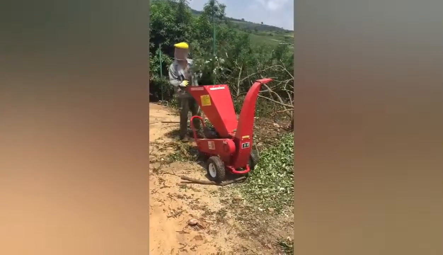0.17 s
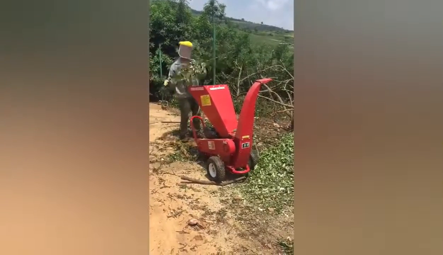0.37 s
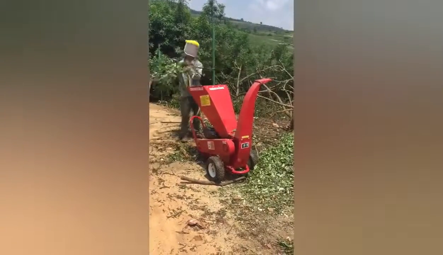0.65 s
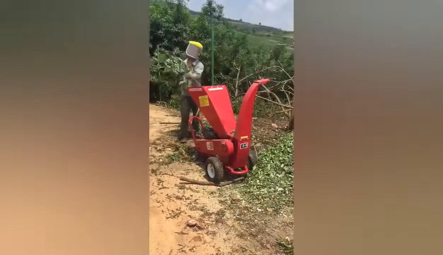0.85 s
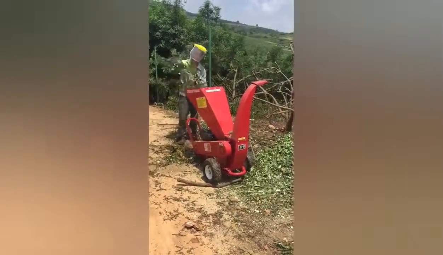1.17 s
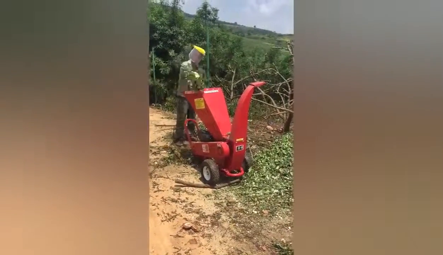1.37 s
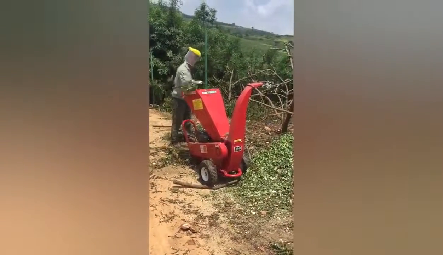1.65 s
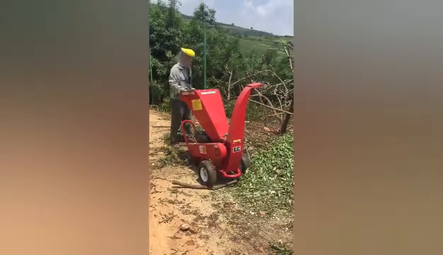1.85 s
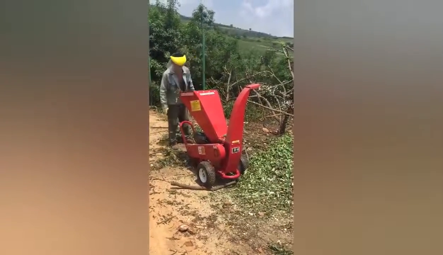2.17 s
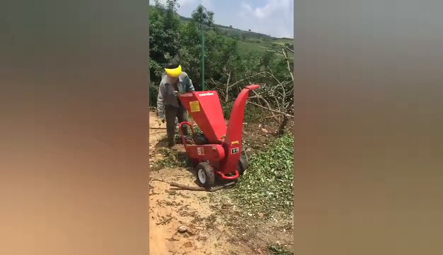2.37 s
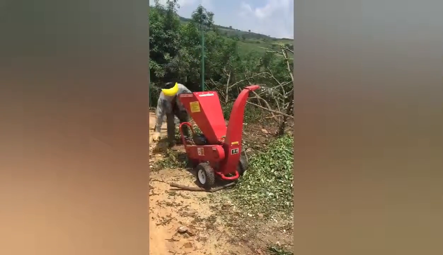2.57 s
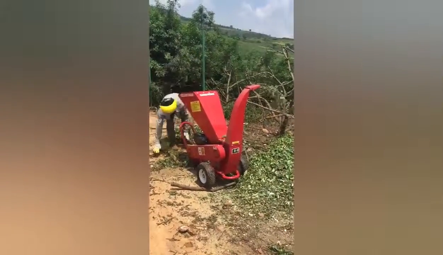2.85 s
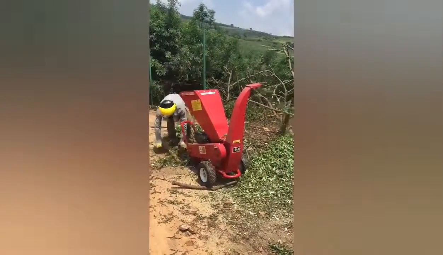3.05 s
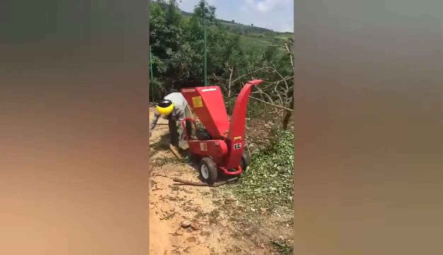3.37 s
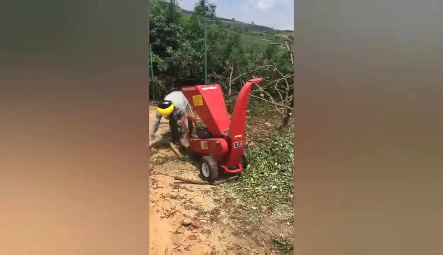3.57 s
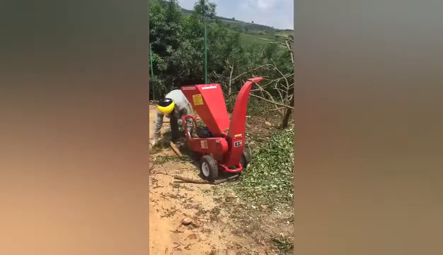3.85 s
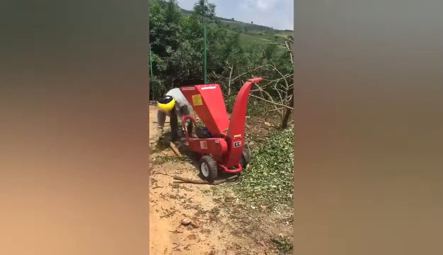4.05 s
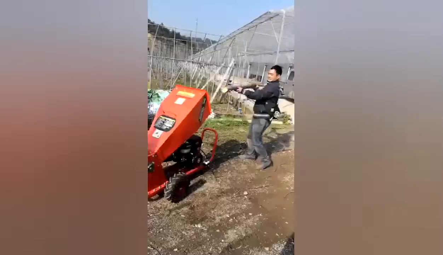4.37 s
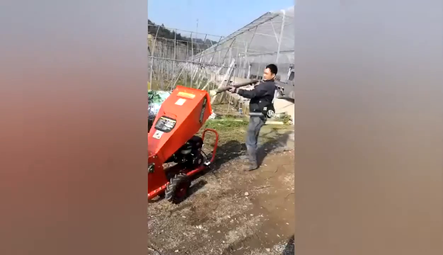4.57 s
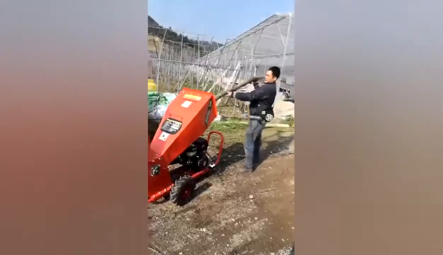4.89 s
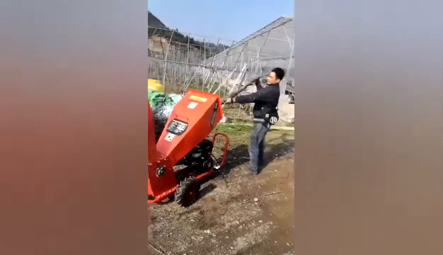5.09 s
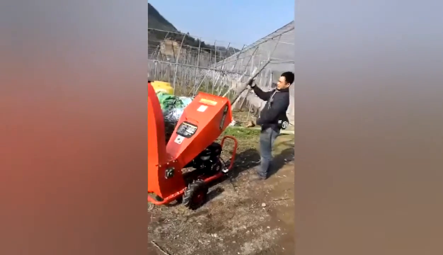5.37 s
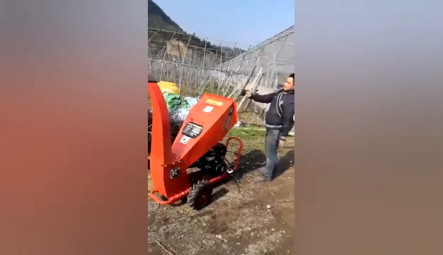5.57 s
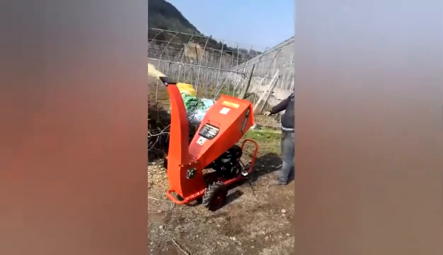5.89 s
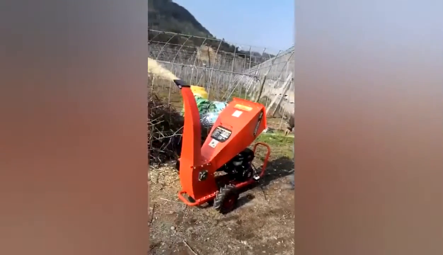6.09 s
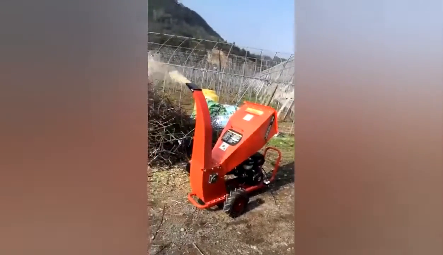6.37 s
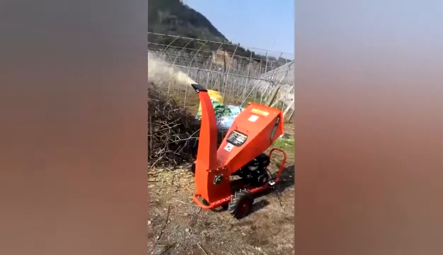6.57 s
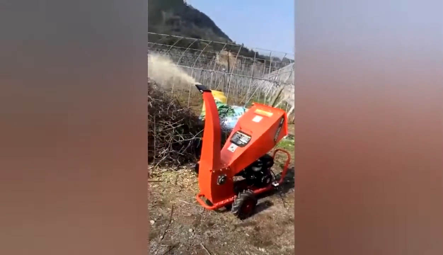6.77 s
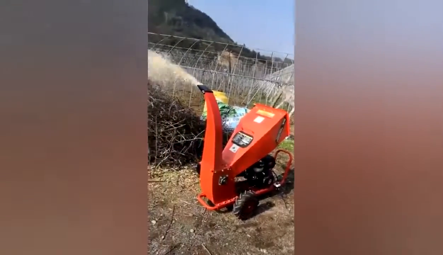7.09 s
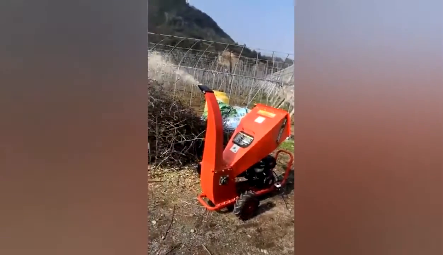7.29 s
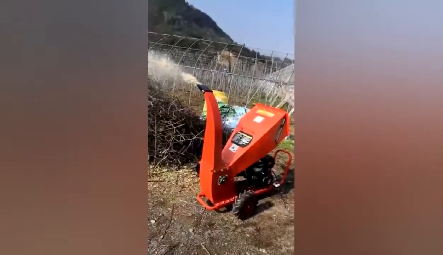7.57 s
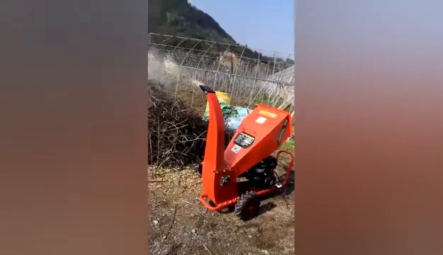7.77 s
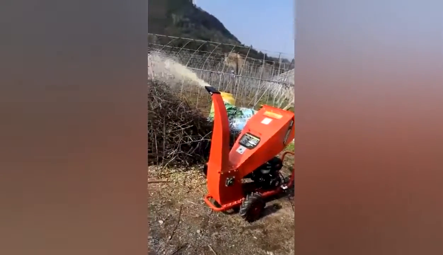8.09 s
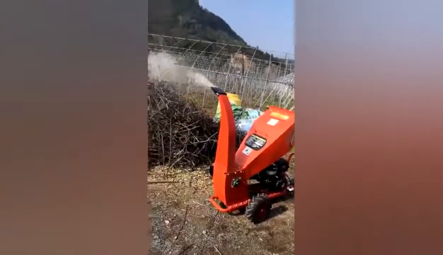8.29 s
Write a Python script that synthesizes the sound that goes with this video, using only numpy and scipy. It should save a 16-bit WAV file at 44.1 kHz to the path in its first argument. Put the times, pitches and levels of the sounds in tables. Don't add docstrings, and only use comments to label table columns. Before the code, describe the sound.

Two engine-driven chippers heard one after the other in open air. The first is far and soft: steady low drone, light metallic ticking, then a spell of twig crackle and drum ringing. After a blink of silence the second starts abruptly, near and loud, droning freely, then dropping in pitch as knives batter wood and chips spray from the chute. Treble is patchy and slightly watery.

```python
import sys
import numpy as np
from scipy import signal
from scipy.fft import rfft, irfft, next_fast_len
from scipy.io import wavfile
from scipy.ndimage import uniform_filter1d, minimum_filter1d

SR = 44100
rng = np.random.default_rng(int(sys.argv[2]) if len(sys.argv) > 2 else 0)


def pcm_store(signal):
    levels = np.round(np.clip(np.atleast_2d(signal), -1, 1) * 32767)
    wavfile.write(sys.argv[1], SR, levels.astype(np.int16).T)


def boost_factor(decibels):
    exponent = np.asarray(decibels, float) / 20
    return 10 ** exponent


N = 372204
TIME = np.arange(N) / SR

# start in seconds, end in seconds.
NEAR_SPAN = (4.647, 8.45)
FAR_SPAN = (0, 4.3375)

# time in seconds, firings per second.
NEAR_SPEED = [(4.65, 30.0), (4.88, 30.1), (5.79, 30.1), (5.99, 26.9), (6.09, 25.5), (6.2, 25.4),
              (6.87, 26.3), (6.95, 26.3), (7.04, 25.9), (7.14, 26.0), (7.64, 27.1), (7.71, 27.7),
              (7.95, 28.3), (8.04, 28.2), (8.27, 29.0), (8.44, 29.1)]
# time in seconds, drone in dB.
NEAR_EXHAUST = [
    (4.65, -27),
    (5.75, -26.3),
    (5.9, -31.5),
    (6.15, -32),
    (6.45, -31.5),
    (6.6, -29),
    (7.4, -29),
    (8.44, -30.3),
]
# multiple of the firing rate, level in dB.
FREE_ORDERS = [(1, -31), (2, -20), (3, -8), (4, 0), (5, -1), (6, -1), (7, -7), (8, -1), (9, -8), (10, -12),
               (11, -14), (26, -11), (30, -13)]
LOADED_ORDERS = [(1, -34), (2, -21), (3, -15), (4, -10), (5, -5), (6, 1), (7, 2), (8, -4), (9, -2), (10, 1),
                 (11, -8), (12, -2), (13, -8), (14, -5), (17, -7), (20, -8)]
# multiple of the knife rate, level in dB.
ROTOR_ORDERS = [(1, -32), (2, -30), (3, -42), (4, -33), (5, -39), (10, -40)]
# frequency in Hz, level in dB per Hz.
FRAME_RUMBLE = [(15, -57), (25, -28), (70, -15.5), (113, -3), (166, -7), (210, -7), (260, -1), (340, -59),
                (570, -120)]
# time in seconds, knife grip as hopper blows in dB, chip flow in dB.
FEED = [(4.65, -33, -40), (4.72, -62, -31.5), (4.87, -52, -35), (4.95, -34, -31.5), (5.74, -42, -32),
        (5.83, -24, -27), (6.17, -17, -26.5), (6.27, -19.5, -29), (6.55, -20, -28.5), (6.75, -17.5, -28.5),
        (7.1, -18.5, -28.5), (7.5, -16, -29.5), (7.9, -21.5, -28), (8.1, -17.5, -29), (8.44, -16, -27.5)]
# time in seconds, change in dB.
BITES = [(4.659, 8.5), (5.15, -0.5), (5.84, 2), (6.02, 0.5), (6.19, 2), (6.31, -2), (6.421, 2), (6.57, 0),
         (6.69, 0.5), (6.97, 0.5), (7.09, -1.5), (7.31, 2.5), (7.551, 2), (7.62, -5.5), (7.66, 2.5),
         (7.71, -4), (7.769, 0.5), (7.88, -2), (8.07, 2.5), (8.211, -8), (8.26, -2), (8.33, -3),
         (8.39, -1.5)]
# time in seconds, peak in dB.
CHOPS = [(4.693, -14), (4.8216, -17), (4.8919, -9), (4.9996, -19), (5.0356, -13), (5.0969, -10),
         (5.1688, -15), (5.3104, -15.5), (5.3454, -14), (5.468, -13), (5.5878, -22), (5.6781, -25),
         (5.835, -11), (5.962, -15), (6.0089, -13), (6.097, -6), (6.1421, -17), (6.236, -11), (6.3316, -29),
         (6.3665, -18), (6.5057, -28), (6.541, -12), (6.632, -15), (6.7931, -17), (6.888, -8), (6.918, -22),
         (6.954, -12), (6.9981, -21), (7.0428, -13.5), (7.1343, -15), (7.2201, -25), (7.37, -17),
         (7.476, -7), (7.548, -6.5), (7.6303, -6), (7.757, -1), (7.82, -7), (7.8729, -5), (8.0576, -9),
         (8.1441, -15), (8.234, -6), (8.3051, -8), (8.374, -5), (8.419, -7)]
# frequency in Hz, width in Hz, level in dB.
HOPPER = [(220.7, 10.7, 1), (306, 13, 1.5), (305, 15, -36), (387, 51, 3.5), (445.4, 75, -3),
          (525.8, 34, -2.5)]
# time in seconds, pitch in Hz, level in dB against the blows.
KNIFE_HUM = [(5.77, 314.2, 7), (5.97, 281, 4), (6.05, 300.3, -30), (6.18, 338, 6), (6.4, 329.2, -5),
             (6.8, 320, -10), (6.95, 306, 3.5), (7.1, 301.8, -4.5), (7.65, 295.2, -4), (7.78, 296.8, -3.5),
             (8.0, 296, 2), (8.3, 298, -0.5), (8.44, 299.6, -8)]
# time in seconds, change in dB.
SWELLS = [(5.83, 8), (6.2, -8), (6.33, 0), (6.42, 8), (6.58, -3), (6.69, 12.5), (6.74, -14), (6.95, -1),
          (7.07, -4), (7.69, -2), (7.76, 12), (7.82, -9), (7.95, 2), (8.07, 5.5), (8.115, -15), (8.17, 8),
          (8.22, -2), (8.26, 9), (8.35, 3)]
# frequency in Hz, level in dB per Hz.
NEAR_CASING = [(260, -2), (450, -8.5), (526, -12), (570, -13), (680, -12), (769, -7), (841, -10), (920, -8),
               (1440, -8), (1940, -6), (2270, -8), (2760, -9), (2950, -10.5), (4700, -23), (5880, -25.5),
               (6500, -29), (8450, -45), (14300, -120)]
# frequency in Hz, width in Hz, level in dB.
PANELS = [(780, 20, -44), (905, 16, -45), (1171, 16, -43), (1516, 22, -42), (1993, 40, -42),
          (2720, 40, -42)]
BIG_PANELS = [(2612, 380, -32), (1967, 76, -38.5), (1780, 390, -40)]
# time in seconds, upper, middle and lower panel in dB,
# share of the low notch from 0 to 1.
WALK = [(4.65, 7, 8, 3, 0.064), (5.7, 1.5, -16, -6, .1), (6.05, 0, 1, -8, 1), (6.68, 5.5, -9, -13, 1),
        (6.76, -6, -5, -6, 1), (6.81, -2, 4, 16, 1), (7.0, -2, 4, 5, 0.99), (7.1, 3, -4, 3, 1),
        (7.2, -17, 0, 5, 1), (7.3, -1, 1, -10, 0.97), (7.45, 0, 10, -1, 1), (7.5, -17, 11, -3, 1),
        (7.8, -2, -5, -1, 0.88), (8.44, -7, 8, -11, 0.66)]
# frequency in Hz, level in dB per Hz.
CHIP_HISS = [(3240, -49), (5500, 0.5), (5890, 1), (6410, -2), (6980, -0.5), (8460, 1.5), (9250, 6),
             (9700, 5), (10700, 1), (12200, -13.5), (14100, -19), (15200, -30)]
# frequency in Hz, width in Hz, depth from 0 to 1.
NOTCHES = [(7230, 1600, 0.42), (6360, 2700, 0.43)]
# frequency in Hz, width in Hz, level in dB.
FAN_WHINE = (9450, 360, -44.5)
# start in seconds, end in seconds, frequency in Hz, level in dB.
HIGH_TONES = [
    (5.05, 6.55, 11542, -50),
    (7.47, 7.65, 11542, -52),
    (5.9, 6.35, 12231, -54),
    (7.0, 7.2, 12231, -55),
    (6.0, 6.3, 12920, -56),
    (7.0, 7.7, 12920, -52),
]

# time in seconds, firings per second.
FAR_SPEED = [(0, 25.55), (1.55, 25.58), (1.85, 25.2), (2.3, 24.65), (2.9, 24.3), (3.15, 24.35),
             (3.85, 24.9), (4.34, 25.25)]
# multiple of the firing rate, level in dB.
FAR_ORDERS = [(1, -36), (2, -26), (3, -16), (4, -1), (5, -1), (6, -13.5), (7, -5), (8, -13), (9, -11),
              (10, -22), (11, -11), (12, -6.5), (13, -11), (14, -14), (15, -11), (20, -18)]
SAG_SHIFTS = {7: -8, 12: -5, 13: -3, 14: 3, 9: 2}
# frequency in Hz, level in dB per Hz.
FAR_RUMBLE = [(18, -52), (30, -27), (50, -22), (75, -20), (110, -15), (160, -12), (215, -3), (330, -2),
              (395, -4), (450, -11), (560, -13), (730, -45)]
FAR_CASING = [(290, -64), (500, -4.5), (551, -18), (606, -3), (721, -6.5), (802, -2), (981, 0.5),
              (1050, -4), (1270, -8.5), (1800, -9.5), (2120, -14), (2830, -19), (3370, -21), (3740, -22),
              (5000, -29), (6500, -39.5), (11000, -120)]
FAR_SHRED = [(1470, 0), (2500, 0), (2780, -0.5), (3100, -9), (3620, -3.5), (4740, -7.5), (9230, -15.5),
             (11300, -19), (12500, -13), (16200, -54), (22000, -120)]
# frequency in Hz, width in Hz, level in dB against the rumble.
CHUTE = [(222, 26, -11), (305, 20, -8), (344, 22, -9), (392, 26, -10)]
# time in seconds, level in dB.
FILL = [
    (0, -1),
    (.7, -0.5),
    (1.4, 0),
    (2.4, 1),
    (2.6, 2.5),
    (2.95, 2.5),
    (3.15, 1),
    (3.5, -2),
    (3.95, -1.5),
    (4.34, -1.5),
]
# time in seconds, change in dB.
LUMPS = [(.07, -7), (.29, -5), (.57, 4), (.95, -13), (1.27, 4), (1.38, -11), (1.6, 4), (1.7, -4),
         (1.86, -9), (2.66, 3), (2.97, -15), (3.15, 5), (3.66, 2), (3.85, -2), (3.96, -8)]
# time in seconds, shredding in dB.
TWIGS = [(0, -64.5), (1.47, -60.5), (1.55, -45), (1.85, -49), (2.05, -47), (2.15, -49.5), (2.7, -48.5),
         (2.82, -54.5), (3.17, -51), (3.27, -63), (3.6, -62), (4.34, -64)]
# time in seconds, level in dB.
SNAPS = [(.15, -55), (.35, -58), (.43, -66), (.49, -62), (.58, -53), (.74, -64.5), (.97, -60), (1.1, -74),
         (1.17, -69), (1.24, -59), (1.59, -64), (1.69, -57), (1.95, -60), (2.25, -55), (2.375, -47),
         (2.7, -61), (2.9, -54), (3.01, -50), (3.085, -57), (3.15, -53), (3.74, -66), (4.15, -66.5)]
# time in seconds, peak in dB.
CRACKS = [(1.4874, -39), (1.6814, -33), (1.846, -39), (1.9049, -35), (2.1409, -45), (2.1638, -42),
          (2.2262, -42), (2.3659, -28), (2.5928, -41), (2.6372, -41), (2.755, -44), (2.8538, -46),
          (2.8927, -46), (2.9989, -39), (3.0713, -44), (3.1426, -41), (3.2204, -51.5), (3.3067, -50)]
# frequency in Hz, width in Hz, level in dB against the casing.
DRUM = [(980, 25, -10), (2010, 130, -18.5)]
# time in seconds, length in seconds, low and high ring in dB.
SURGES = [(1.67, .03, 2, 6), (1.82, .03, -3, 6), (2.05, .03, 0, 5), (2.3, .015, -3, 2), (2.42, .03, -1, 3),
          (2.565, 0.022, 8, -1), (2.627, 0.034, 11.5, -2), (2.695, 0.03, -1, 13.5), (2.79, .02, -4, -2),
          (2.914, 0.03, -3, 15.5), (3.02, 0.033, 3, 5), (3.09, 0.035, -10, 11), (3.135, 0.028, 10, -7),
          (3.252, 0.023, 6.5, -3)]
# frequency in Hz, level in dB, decay time t60 in seconds.
TAPPET = [(3350, 0, .012), (3560, -3, .01), (2750, -11, .006), (4350, -10, .005), (6300, -16, .003)]
# time in seconds, peak in
# dB.
SLAPS = [(0.0248, -41.5), (0.0643, -47), (0.1426, -32.5), (0.1825, -34), (0.261, -33.5), (0.2987, -43.5),
         (0.3391, -40), (0.378, -41), (0.4186, -34.5), (0.4569, -45), (0.497, -32), (0.5352, -40.5),
         (0.574, -34), (0.6135, -37), (0.6529, -39), (0.6918, -47), (0.7312, -31.5), (0.7696, -35),
         (0.8091, -33), (0.848, -38), (0.9273, -37), (0.9652, -34), (1.0046, -36), (1.0834, -41),
         (1.1214, -38), (1.2392, -32), (1.3164, -35), (1.3548, -38), (1.3942, -37), (1.4331, -37),
         (1.511, -41), (1.5888, -37), (1.6671, -49), (1.6881, -38), (1.7459, -43), (1.8332, -36),
         (1.9041, -39), (1.9839, -30), (2.0113, -34), (2.0642, -38), (2.1051, -42), (2.367, -49),
         (2.4279, -35), (2.5416, -40), (2.5616, -38), (2.5955, -38.5), (2.6778, -36), (2.7636, -41),
         (2.8664, -40), (2.8898, -39), (2.9971, -41), (3.07, -37), (3.5414, -44), (3.583, -41),
         (3.6621, -43), (3.8217, -37), (3.9015, -36), (3.9409, -43), (3.9809, -41), (4.139, -33.5)]
# frequency in Hz, width in Hz, level in dB.
COOLING_FAN = [(7000, 600, -71), (9200, 700, -75)]

# time in seconds, frequency in Hz, level in dB, length in seconds.
THUDS = [(1.6, 213, -36, .03), (3.146, 208, -31.5, 0.034), (2.7, 340, -36, .04), (4.668, 300, -21, 0.015),
         (4.7, 200, -25, .03), (5.166, 199.7, -21, 0.023), (5.785, 149, -22, .03),
         (6.03, 525, -26.5, 0.041), (6.6, 139.8, -22, .03), (6.82, 450, -30, .04), (6.83, 534, -26, .04),
         (7.043, 123.7, -22, .05), (7.3, 110, -21.5, .04), (7.496, 448, -25, .06), (7.658, 130, -26, 0.028),
         (7.78, 382, -33, 0.069), (8.252, 385, -26.5, 0.11)]

# time in seconds, dB under its neighbours at which a band is lost,
# reach of distant bands in dB, want in the middle treble, want at the top (lower want keeps more).
THRIFT = [(0, 7, -30, -2.6, -3), (2.85, 7.5, -30, -2.4, -3), (2.95, 4.5, -20, -.8, -1),
          (3.7, 4.5, -20, -.9, -1), (3.8, 7, -30, -2.4, -3), (4.5, 7, -30, -2.4, -3),
          (4.6, 7.5, 3, -4, -1.1), (6.1, 8, 2, -4, -1), (6.5, 8, 2, -4, -1.5), (8.44, 8.5, 1, -4, -2)]
# frequency in Hz, half width in Hz, extra want.
WEAK_BANDS = [(2230, 110, 1.1), (2920, 130, 1.0), (4500, 100, .6), (5900, 250, .7)]
LEAN_MOMENTS = [2.95, 3.04, 3.2, 3.27, 3.35, 3.43, 3.55, 3.67]


def near_chipper(t):
    (per_s,), (drone_db,) = in_time(NEAR_SPEED, t), in_time(NEAR_EXHAUST, t)
    grip_db, flow_db = in_time(FEED, t)
    bite_db = bumps(*np.transpose(BITES), 0.015, t)
    blows_db, hiss_db = grip_db + bite_db, flow_db + 0.69 * bite_db
    casing_db = -19.5 + 0.24 * (flow_db - flow_db.mean()) + 0.69 * bite_db
    firings = np.cumsum(per_s) / SR
    passes = 3.4 * firings
    free = np.clip(2 * (per_s - 29.4), 0, 1)
    cuts = chops(t)
    *sides_db, low_share = in_time(WALK, t)

    exhaust = boost_factor(drone_db) * near_exhaust(firings, free)
    rotor = (0.16 + 1.17 * free) * drone(passes, ROTOR_ORDERS, wobble_db=0.25, wander=0.06)
    rumble = frame_rumble(firings, drone_db, free)
    throat = boost_factor(blows_db - 2.5) * (hopper(firings, passes) + knife_hum(t))
    shake = beating(passes, 0.15, 2.3) * (1 + 0.031 * np.cos(2 * np.pi * firings))
    shake = (shake + 0.5 * grains(np.full(len(t), 700), spread_db=2.5)) * cuts
    casing = boost_factor(casing_db + 2.5) * colour(shake, NEAR_CASING, 1.0, 27.0)
    sheets = boost_factor(casing_db + 19) * panels(shake, sides_db)
    hiss = chip_hiss(firings, hiss_db, cuts, casing, low_share)
    return exhaust + rotor + rumble + throat + casing + sheets + hiss + high_tones(t)


def near_exhaust(firings, free):
    idle = free * drone(firings, FREE_ORDERS, wobble_db=.09, wander=.025)
    labour = (1 - free) * drone(firings, LOADED_ORDERS, wobble_db=.12, wander=.025)
    return idle + labour


def frame_rumble(firings, drone_db, free):
    heavy_db = -18.5 + 2.8 * (drone_db - np.median(drone_db)) - 14 * free
    return boost_factor(heavy_db - 4.5) * colour(beating(firings, .3, 3.0), FRAME_RUMBLE, 1.5, 10)


def hopper(firings, passes):
    size = len(firings)
    blows = .85 * pulses(passes, 3.0, .04) + .6 * pulses(firings, 1.5, .01)
    blows = blows + .45 * rng.standard_normal(size)
    out = np.zeros(size)
    for k, (hz, width_hz, db) in enumerate(HOPPER):
        ring = resonate(resonate(blows, hz, 1.34 * width_hz), hz, 1.04 * width_hz)
        out += (-1) ** k * boost_factor(db + drift(6.5, size)) * ring / np.sqrt(width_hz)
    return rms_one(out)


def knife_hum(t):
    hz, level_db = in_time(KNIFE_HUM, t)
    turn = 2 * np.pi * np.cumsum(hz) / SR
    steady = (2.2 + drift(14.0, len(t))) * np.cos(turn)
    rough = drift(14.0, len(t)) * np.sin(turn)
    swell_db = bumps(*np.transpose(SWELLS), 0.023, t)
    return boost_factor(level_db + swell_db) * rms_one(steady + rough) * (t > KNIFE_HUM[0][0])


def chops(t):
    kicks = np.full(len(t), 1e-18)
    s, db = np.transpose(CHOPS)
    kicks[np.clip(((s - t[0]) * SR).astype(int), 0, len(t) - 1)] = boost_factor(db + 3.5)
    return 1 + decay(kicks, 0.011)


def panels(shake, sides_db):
    size = len(shake)
    out = np.zeros(size)
    for hz, width_hz, db in PANELS:
        out += boost_factor(db + 3.8 * drift(6.9, size)) * twice(shake, hz, width_hz)
    for (hz, width_hz, db), side_db in zip(BIG_PANELS, sides_db):
        out += boost_factor(db + side_db) * twice(shake, hz, width_hz)
    return out


def chip_hiss(firings, hiss_db, cuts, casing, low_share):
    size = len(firings)
    patter = grains(2500 * boost_factor(1.7 * drift(21, size)), spread_db=6.0)
    chips = beating(firings, 0.05, 3.2) + 0.13 * patter
    hiss = boost_factor(hiss_db + 0.5) * colour(chips * cuts ** 0.61, CHIP_HISS, 2.2, 36.0)
    bright = hiss + casing
    for (hz, width_hz, depth), share in zip(NOTCHES, (1 - low_share, low_share)):
        hiss = hiss - share * depth * resonate(bright, hz, width_hz)
    whine_hz, width_hz, whine_db = FAN_WHINE
    whine_db = whine_db + 0.44 * (hiss_db - hiss_db.mean())
    return hiss + boost_factor(whine_db) * twice(chips, whine_hz, width_hz)


def high_tones(t):
    out = np.zeros(len(t))
    for start, end, hz, db in HIGH_TONES:
        fade = np.clip(np.minimum(t - start, end - t) / .02, 0, 1)
        out += boost_factor(db) * np.sin(2 * np.pi * hz * t) * fade
    return out


def far_chipper(t):
    (per_s,), (fill_db,), (flow_db,) = in_time(FAR_SPEED, t), in_time(FILL, t), in_time(TWIGS, t)
    sag_hz = per_s.max() - per_s
    firings = np.cumsum(per_s) / SR + .35
    lump_db = bumps(*np.transpose(LUMPS), 0.017, t)
    casing_db = -42 + fill_db + 0.13 * lump_db
    rumble_db = -36.5 + 0.37 * fill_db + lump_db
    snap_s, snap_db = np.transpose(SNAPS)
    shred_db = 20 * np.log10(boost_factor(flow_db) + bumps(snap_s, boost_factor(snap_db), 0.013, t))
    knock = beating(firings, 0.53, 2.1)
    crackle = rng.standard_normal(len(t))
    crackle = crackle + 0.5 * grains(700 * boost_factor(5 * drift(17, len(t))), spread_db=2.5)

    exhaust = far_exhaust(firings, sag_hz)
    rumble = far_rumble(firings, knock, rumble_db)
    casing = boost_factor(casing_db + 4.0) * colour(beating(firings, 0.043, 1.34), FAR_CASING, 1.0, 22.0)
    shred = boost_factor(shred_db + 3 + .8 * drift(20, len(t))) * colour(crackle, FAR_SHRED, 1.5, 20)
    rings = drum(crackle, casing_db, shred_db, t)
    ticks = valve_ticks(*tick_times(firings, sag_hz), len(t))
    whir = sum(boost_factor(db) * twice(knock, hz, width_hz) for hz, width_hz, db in COOLING_FAN)
    whole = exhaust + rumble + casing + shred + cracks(t) + rings + ticks + whir
    return signal.sosfilt(signal.cheby2(10, 50, 12900, fs=SR, output="sos"), whole)


def far_exhaust(firings, sag_hz):
    orders = []
    for multiple, db in FAR_ORDERS:
        db = db + SAG_SHIFTS.get(multiple, 0) * sag_hz
        if multiple == 5:
            db = db - 9 * sag_hz ** 2
        if multiple == 6:
            db = db + 5 * sag_hz
        orders.append((multiple, db))
    return boost_factor(-37.5 - 0.5 * sag_hz) * drone(firings, orders, wobble_db=.1, wander=.03)


def far_rumble(firings, knock, rumble_db):
    out = boost_factor(rumble_db - 1.5) * colour(beating(firings, .3, 0.91), FAR_RUMBLE, 0.69, 24.0)
    for hz, width_hz, db in CHUTE:
        out = out + boost_factor(rumble_db + db + 0.56 * drift(3.0, len(knock))) * twice(knock, hz, width_hz)
    return out


def drum(crackle, casing_db, shred_db, t):
    busy_db = casing_db + 0.16 * (uniform_filter1d(shred_db, size=8000) + 67.0)
    s, length_s, *surges_db = np.transpose(SURGES)
    out = np.zeros(len(t))
    for (hz, width_hz, db), surge_db in zip(DRUM, surges_db):
        level_db = busy_db + db + bumps(s, surge_db, length_s[:, None], t) + 2.3 * drift(5.6, len(t))
        out += boost_factor(level_db) * twice(crackle, hz, width_hz)
    return out


def cracks(t):
    kicks = np.full(len(t), 1e-18)
    s, db = np.transpose(CRACKS)
    kicks[(s * SR).astype(int)] = boost_factor(db - 5)
    burst = rng.standard_normal(len(t)) * decay(kicks, 0.005)
    return signal.sosfilt(signal.butter(2, [3000, 9000], "band", fs=SR, output="sos"), burst)


def tick_times(firings, sag_hz):
    at = np.flatnonzero(np.diff(np.floor(firings)))
    chance = np.clip(rng.standard_normal(len(at)), -2.5, 1)
    db = -41.5 - 4 * sag_hz[at] + 2 * chance
    slap_s, slap_db = np.transpose(SLAPS)
    slap_at = (slap_s * SR).astype(int)
    alone = abs(at[:, None] - slap_at).min(axis=1) > SR // 70
    return np.r_[at[alone], slap_at], np.r_[db[alone], slap_db]


def valve_ticks(at, peak_db, size):
    mix_db = rng.standard_normal((len(at), len(TAPPET)))
    rattle = rng.standard_normal(size)
    out = np.zeros(size)
    for k, (hz, db, t60) in enumerate(TAPPET):
        clicks = np.full(size, 1e-18)
        clicks[at] = boost_factor(peak_db + db - 3.5 + mix_db[:, k])
        clicks = clicks + .035 * rattle * decay(clicks, 0.017)
        r, w = boost_factor(-60 / (t60 * SR)), 2 * np.pi * hz / SR
        out += signal.lfilter([0, np.sin(w)], [1, -2 * r * np.cos(w), r * r], clicks)
    return (resonate(out, 3500, 1900) + .35 * out) * boost_factor(-.2)


def thuds():
    out = np.zeros(N)
    for s, hz, db, length_s in THUDS:
        near = slice(int((s - 3 * length_s) * SR), int((s + 3 * length_s) * SR))
        swell = np.exp(-.5 * ((TIME[near] - s) / length_s) ** 2)
        out[near] += np.sqrt(2) * boost_factor(db) * swell * np.sin(2 * np.pi * hz * TIME[near])
    return out


def drone(cycles, orders, wobble_db, wander):
    size = len(cycles)
    out = np.zeros(size)
    for k, db in orders:
        level = np.sqrt(2) * boost_factor(db + wobble_db * k * drift(5.1, size))
        phase = 2 * np.pi * (k * cycles + rng.random()) + wander * k * drift(5.3, size)
        out += level * np.sin(phase)
    return out


def beating(cycles, depth, sharp):
    swell = sharp * np.exp(-sharp * (cycles % 1))
    return rng.standard_normal(len(cycles)) * (1 - depth + depth * swell)


def pulses(cycles, uneven_db, jitter):
    size = len(cycles)
    marks = np.diff(np.floor(cycles + jitter * drift(40, size)), prepend=0) > 0
    return rms_one(marks * boost_factor(uneven_db * rng.standard_normal(size)))


def grains(per_s, spread_db):
    size = len(per_s)
    sizes = boost_factor(spread_db * np.minimum(rng.exponential(1, size), 5)) * rng.choice([-1, 1], size)
    return rms_one(sizes * (rng.random(size) < per_s / SR))


def colour(x, spectrum, patchy_db, flicker_hz):
    size = next_fast_len(len(x))
    octave = np.log2(np.arange(1, size // 2 + 2) * SR / size)
    hz, level_db = np.transpose(spectrum)
    at = np.log2(hz)
    shaped = rfft(x, size) * boost_factor(np.interp(octave, at, level_db, left=-120, right=-120))
    out = np.zeros(len(x))
    for centre in np.arange(at[0], at[-1] + .5, .5):
        band = irfft(shaped * np.clip(1 - 2 * abs(octave - centre), 0, 1), size)[:len(x)]
        out += band * boost_factor(patchy_db * drift(flicker_hz, len(x)))
    return rms_one(out)


def resonate(x, hz, width_hz):
    r = np.exp(-np.pi * width_hz / SR)
    poles = [1, -2 * r * np.cos(2 * np.pi * hz / SR), r * r]
    return signal.lfilter([(1 - r * r) / 2, 0, (r * r - 1) / 2], poles, x)


def twice(x, hz, width_hz):
    return rms_one(resonate(resonate(x, hz, width_hz), hz, width_hz))


def decay(kicks, fade_s):
    return signal.lfilter([1], [1, -np.exp(-1 / (fade_s * SR))], kicks)


def bumps(s, heights, width_s, t):
    coarse = t[::32]
    bells = np.exp(-.5 * ((coarse - np.asarray(s)[:, None]) / width_s) ** 2)
    return np.interp(t, coarse, np.asarray(heights) @ bells)


def drift(rate, size):
    r = np.exp(-80 * np.pi * rate / SR)
    noise = rng.standard_normal(size // 40 + 2002)
    slow = signal.lfilter([1], [1, -2 * r, r * r], noise)[2000:]
    return np.interp(np.arange(size) / 40, np.arange(len(slow)), rms_one(slow))


def in_time(rows, t):
    s, *columns = np.transpose(rows)
    return [np.interp(t, s, c) for c in columns]


def rms_one(x):
    return x / np.sqrt(np.mean(x ** 2) + 1e-20)


def patchy_treble(x, from_hz):
    hz, s, cells = signal.stft(x, SR, nperseg=1024, noverlap=640)
    hz, far = hz[:, None], s < FAR_SPAN[1]
    low, thin = hz < from_hz, hz >= 11000
    under_db, far_db, want_mid, want_top = in_time(THRIFT, s)
    lean = sum(abs(s - at) < .018 for at in LEAN_MOMENTS)
    want_mid = want_mid - .25 * far + .9 * lean
    now = abs(cells) ** 2
    power = uniform_filter1d(now, size=5, axis=-1)
    narrow, near, wide = (uniform_filter1d(power, size=bins, axis=-2) for bins in (4, 40, 150))
    reach_db = np.interp(hz, [5500, 6200, 8000, 9000], [-40, -3, -3, -19]) + far_db
    mask = np.maximum(near, wide * boost_factor(reach_db)) * boost_factor(-2 * under_db)
    keep = (narrow > mask) & (now > .9 * mask) | low
    luck = rms_one(uniform_filter1d(rng.standard_normal((len(hz) // 6 + 1, len(s))), size=9))
    luck = luck.repeat(6, axis=0)[:len(hz)]
    luck = luck - sum(want * (abs(hz - at) < half) for at, half, want in WEAK_BANDS) * far
    keep &= (luck > np.where(thin, want_top, want_mid)) | (now > 6 * near) | low
    tops = -minimum_filter1d(-power, size=21, axis=-2)
    keep &= (power > tops / 14) | ~thin
    for start, end, tone_hz, _ in HIGH_TONES:
        beside = (hz > tone_hz - 480) & (hz < tone_hz + 330) & (abs(hz - tone_hz) > 70)
        keep &= ~((s > start) & (s < end) & beside & (luck < 1.2))
    flicker = uniform_filter1d(rng.standard_normal(len(s)), size=6)
    hurdle = np.where(hz < 14950, np.where(s < 6.42, -.6, 0), .6)
    keep &= (hz < 13850) | (flicker > hurdle)
    gain = np.where(keep, 1, .03 * ~thin)
    return signal.istft(cells * gain, SR, nperseg=1024, noverlap=640)[1][..., :N]


def scene():
    out = np.zeros((1, N))
    for machine, (start, end) in ((far_chipper, FAR_SPAN), (near_chipper, NEAR_SPAN)):
        heard = (TIME >= start) & (TIME < end)
        out[0, heard] = machine(TIME[heard])
    return out + thuds()


def band_limit(x):
    return signal.sosfilt(signal.butter(12, 15390, fs=SR, output="sos"), x)


def record(dry):
    rounded = 1.103 * np.tanh(dry / 1.218)
    running = (TIME < FAR_SPAN[1]) | (TIME >= NEAR_SPAN[0])
    mix = patchy_treble(rounded, from_hz=1840) * running
    return band_limit(mix)


dry = scene()
out = record(dry)
pcm_store(out)
```